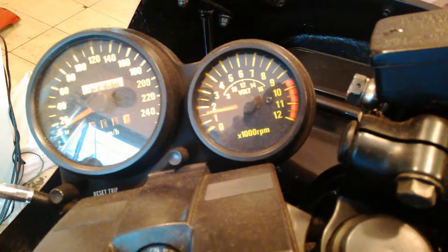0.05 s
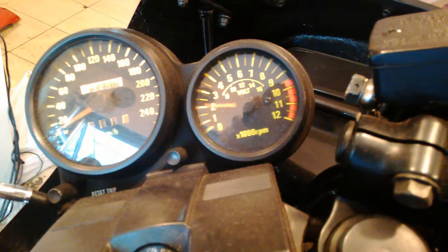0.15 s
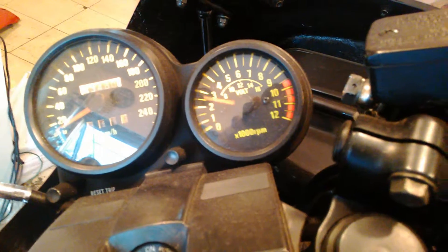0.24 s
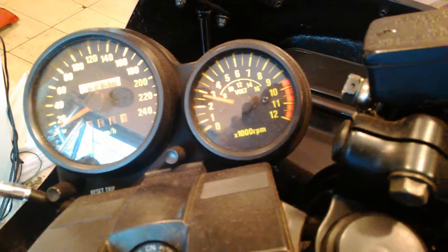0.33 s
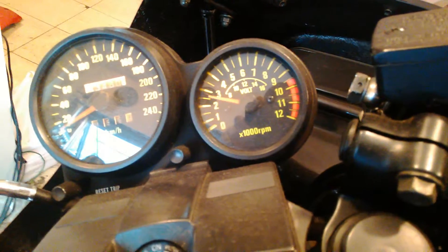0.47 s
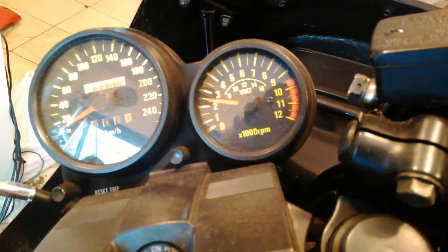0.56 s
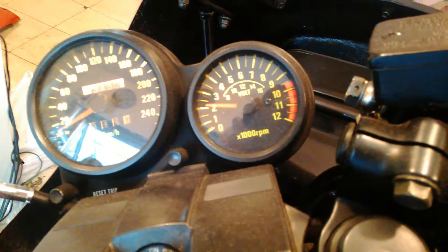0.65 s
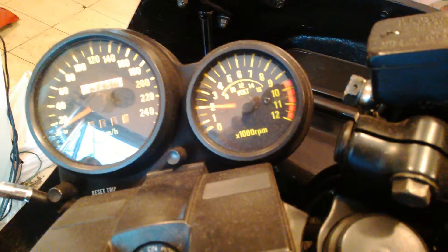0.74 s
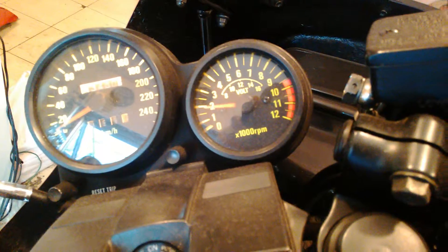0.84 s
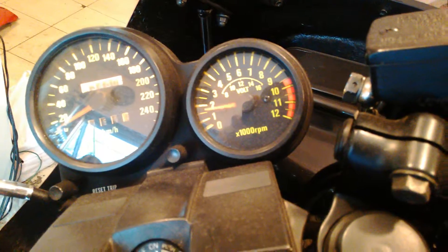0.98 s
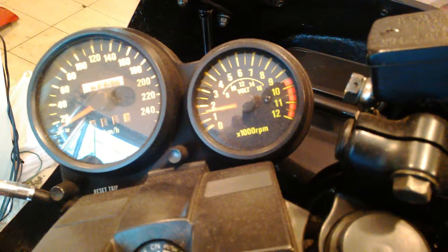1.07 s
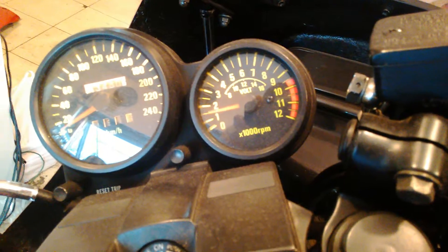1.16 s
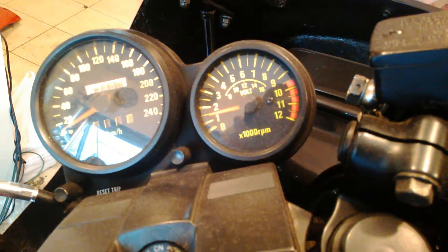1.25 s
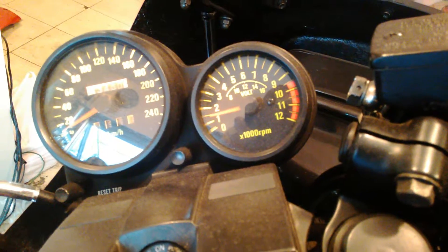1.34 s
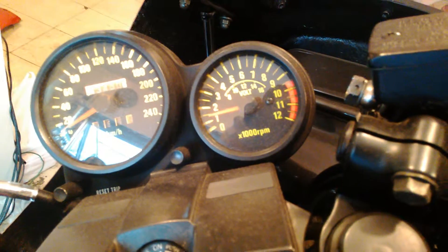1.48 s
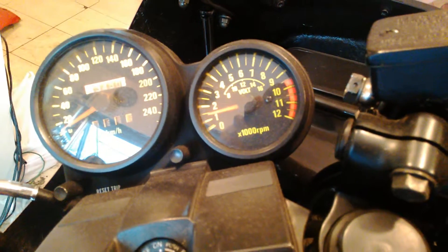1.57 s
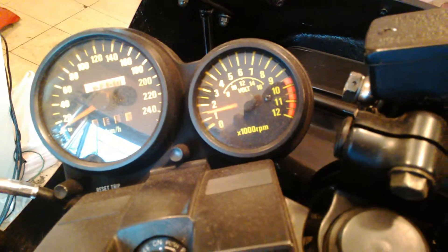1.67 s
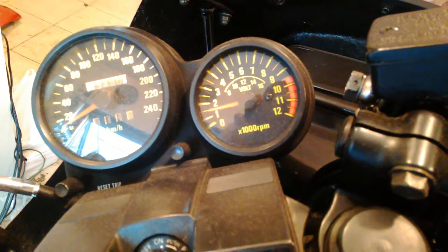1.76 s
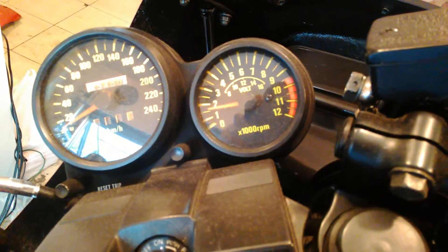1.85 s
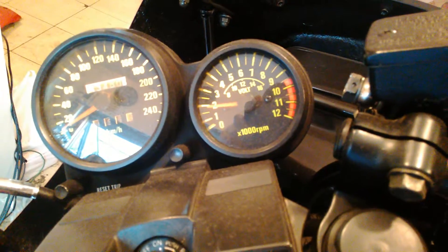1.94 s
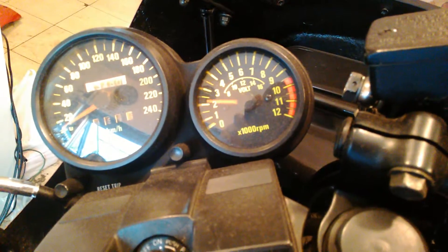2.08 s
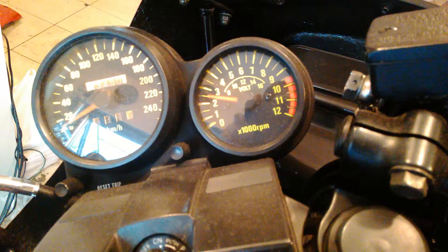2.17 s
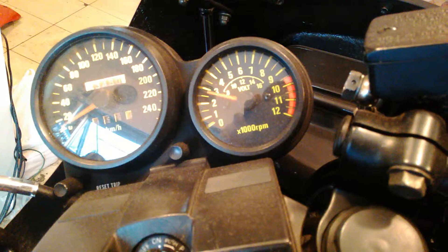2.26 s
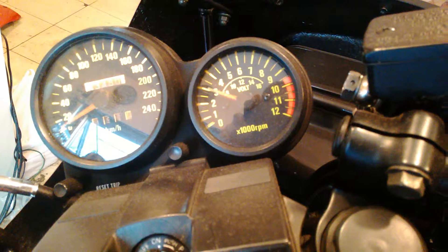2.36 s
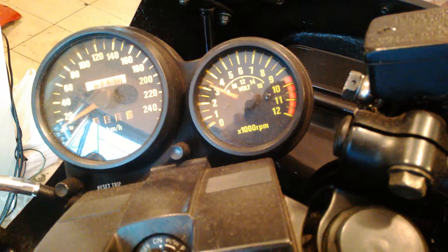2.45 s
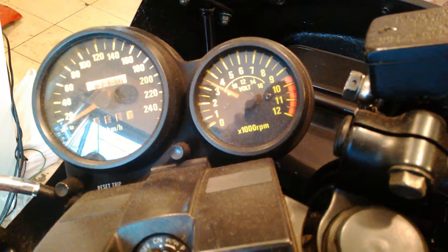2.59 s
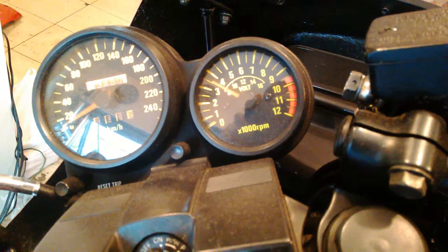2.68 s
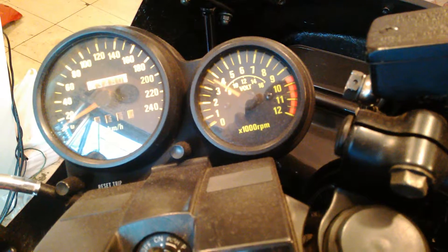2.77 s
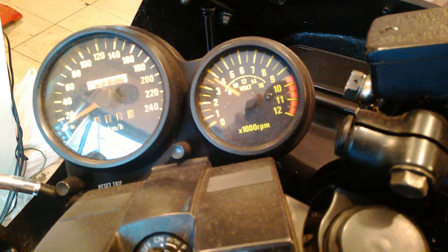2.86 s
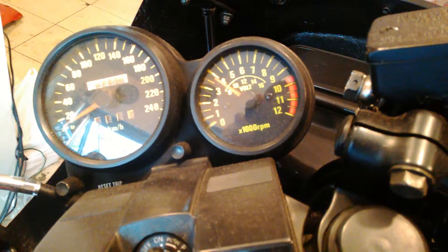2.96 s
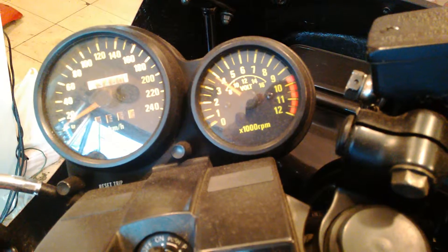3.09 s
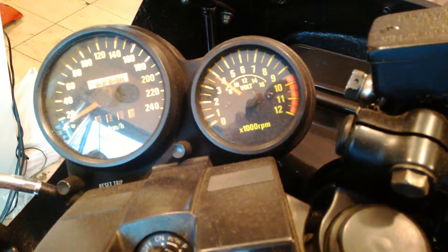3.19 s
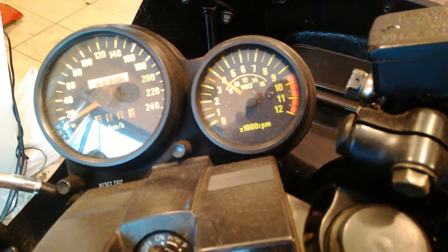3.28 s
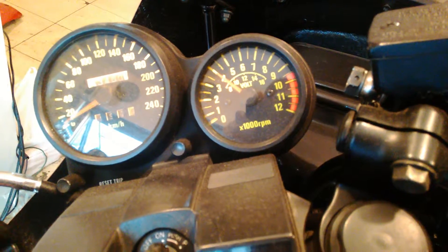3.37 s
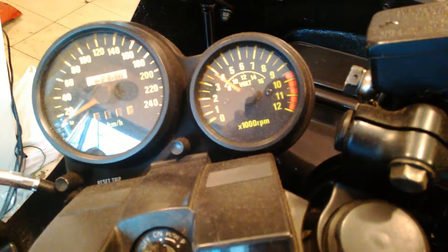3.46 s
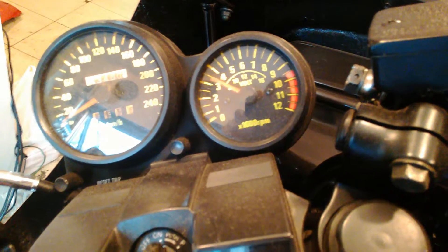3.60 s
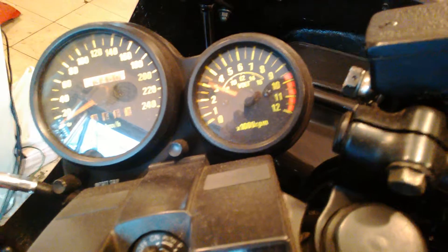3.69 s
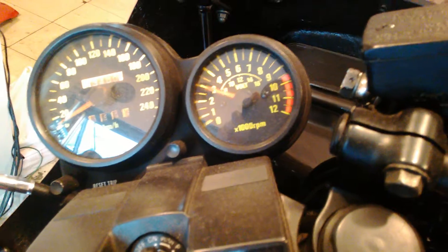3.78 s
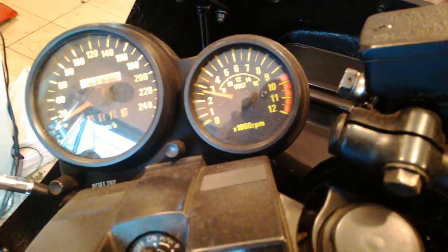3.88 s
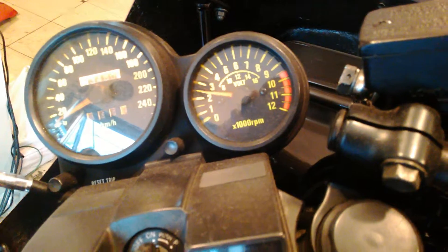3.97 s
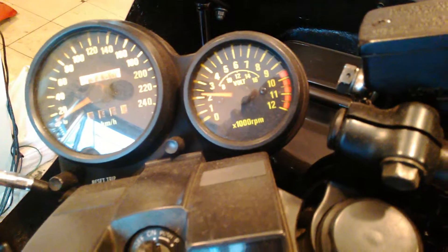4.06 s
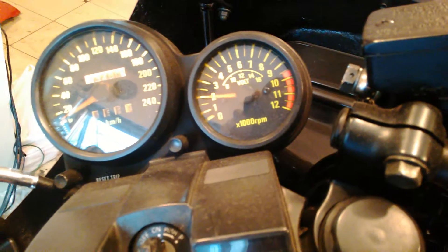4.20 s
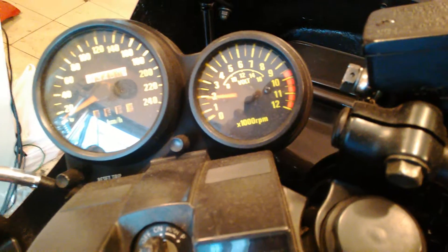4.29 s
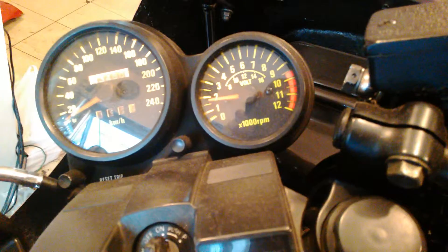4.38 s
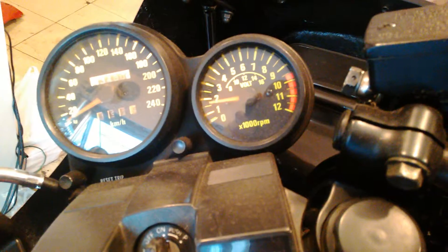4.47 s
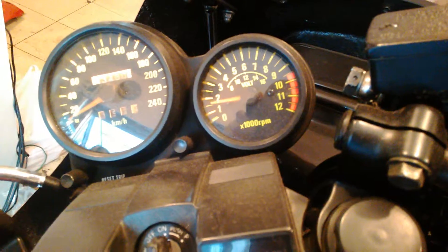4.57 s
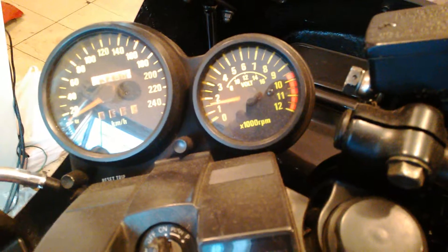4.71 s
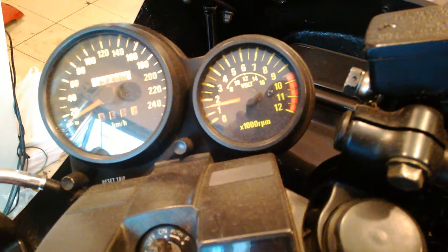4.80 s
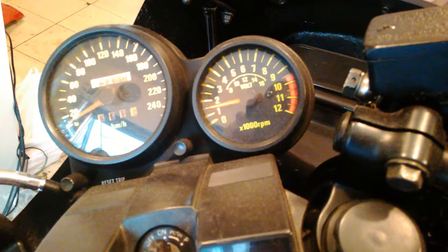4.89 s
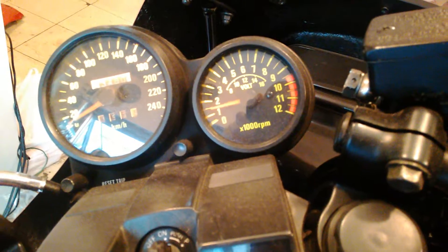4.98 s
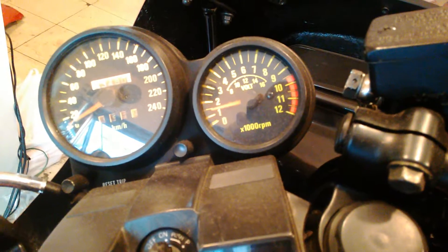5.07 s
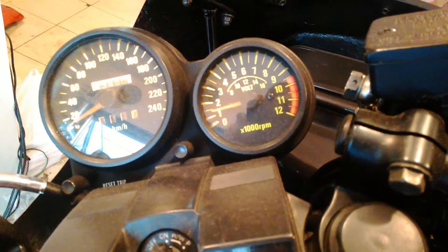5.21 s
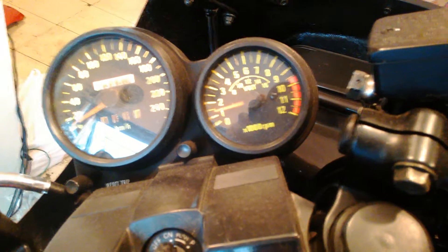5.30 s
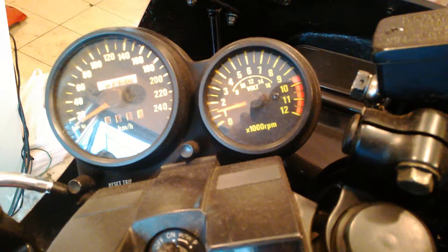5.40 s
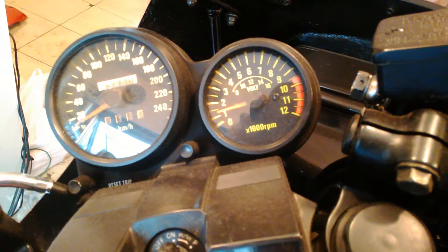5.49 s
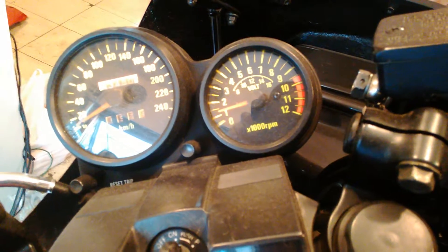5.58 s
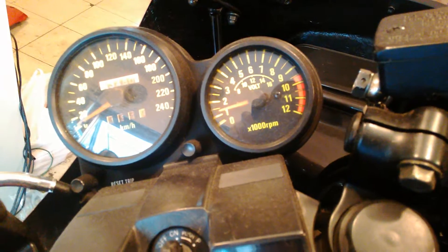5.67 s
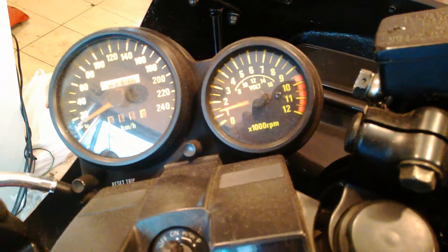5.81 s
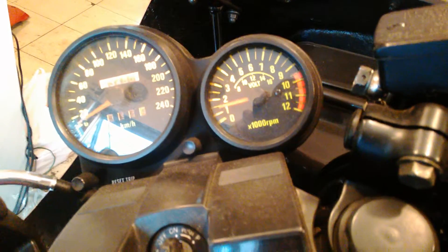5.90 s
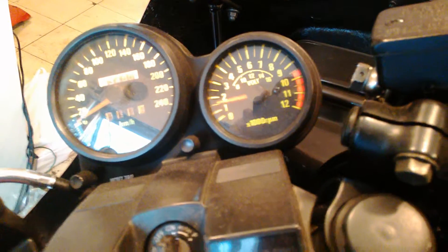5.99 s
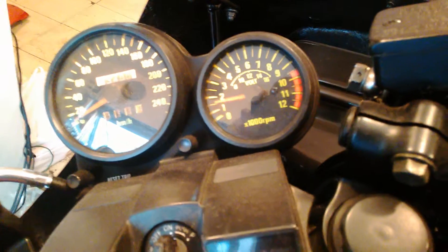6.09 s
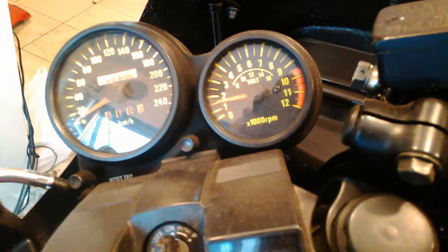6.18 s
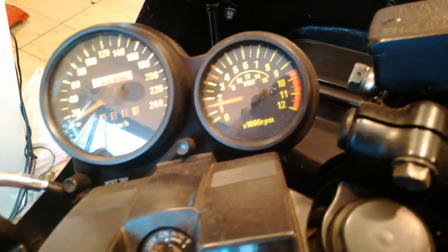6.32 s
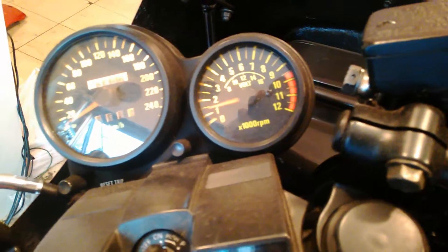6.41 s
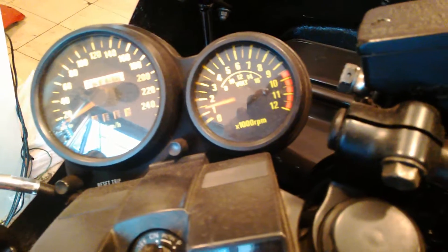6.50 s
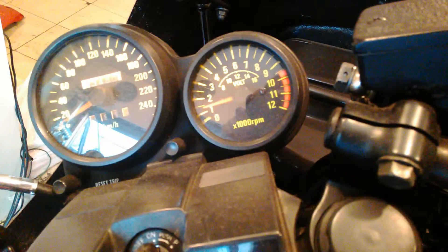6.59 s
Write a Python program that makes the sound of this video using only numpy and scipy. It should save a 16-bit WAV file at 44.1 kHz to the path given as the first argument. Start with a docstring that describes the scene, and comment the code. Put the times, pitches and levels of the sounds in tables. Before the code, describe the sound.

A four-cylinder motorcycle engine in a hard tiled workshop snaps up in a blip, idles lumpily, pulls into a longer rev, drops, then blips briefly.

```python
"""A four-cylinder motorcycle engine idles in a tiled workshop and is revved: a blip, a long pull, a small blip.
Each firing sends a boom and a puff down the exhaust; the puffs ring the pipe and overtones grow with speed.
Pistons, valves and cam chain clatter in step with the crank, as bursts of noise and ringing metal.
A gear whines, the intake gasps and gulps air, a dry joint squeaks at idle and a microphone hisses faintly.
"""
import sys
import numpy as np
from scipy import signal
from scipy.fft import rfft, irfft, next_fast_len
from scipy.io import wavfile
from scipy.ndimage import uniform_filter1d, map_coordinates

SR = 44100
rng = np.random.default_rng(int(sys.argv[2]) if len(sys.argv) > 2 else 0)


def master(y):
    """Save y as 16-bit WAV."""
    cut = np.clip(np.atleast_2d(y).T, -1, 1)
    pcm = np.round(cut * 32767)  # scale
    wavfile.write(sys.argv[1], SR, pcm.astype(np.int16))


N = 293253


def amp(db):
    """Turn decibels into a gain."""
    return 10 ** (np.asarray(db) / 20)


def unit(x):
    """Scale to an rms of 1."""
    return x / np.sqrt(np.mean(x ** 2) + 1e-20)


def steady(x, size=5000):
    """Hold the running rms near 1, so that level can be set separately."""
    power = uniform_filter1d(uniform_filter1d(x ** 2, size), size)
    return x / np.sqrt(np.abs(power) + 1e-12)


def along(points, hz):
    """Read a value between (frequency [Hz], value) points on a log frequency axis."""
    f, v = np.transpose(points)
    return np.interp(np.log(hz + 1), np.log(f + 1), v)


def wobble(rate):
    """A smooth random curve with rate random points a second."""
    points = rng.standard_normal(int(N * rate / SR) + 4)
    return map_coordinates(points, [np.arange(N) * rate / SR])


def delayed(x, s):
    """Shift a control curve s seconds later (earlier if s is negative)."""
    return np.interp(np.arange(N) - s * SR, np.arange(N), x)


def swells(rows):
    """Add up bell-shaped swells; each falls to about a third of its height at its half length."""
    t = np.arange(N) / SR
    return sum(height * np.exp(-((t - s) / half) ** 2) for s, half, height in rows)


def filtered(x, response):
    """Multiply the spectrum of x by a response that depends on frequency."""
    m = next_fast_len(N + SR // 2)
    return irfft(rfft(x, m) * response(np.fft.rfftfreq(m, 1 / SR)), m)[:N]


def coloured(x, spectrum):
    """Shape x with a (frequency [Hz], gain [dB]) curve."""
    return filtered(x, lambda hz: amp(along(spectrum, hz)))


def resonate(x, modes):
    """Ring x through side-by-side resonances, whose signs alternate."""
    def response(f):
        total = 0
        for k, (centre, width, db) in enumerate(modes):
            ring = 1j * f * width / (centre ** 2 - f ** 2 + 1j * f * width)
            total = total + (-1) ** k * amp(db) * ring
        return total
    return filtered(x, response)


def strikes(firings, pattern_db, scatter_db, jitter, count=1):
    """Clicks, count per firing, whose sizes repeat a pattern; jitter is in firings."""
    k = np.arange(int(firings[-1] * count))
    chance = rng.standard_normal((len(k), 2))
    at = np.interp(k / count + jitter * chance[:, 0], firings, np.arange(N))
    size = amp(np.resize(pattern_db, len(k)) + scatter_db * chance[:, 1])
    return np.bincount(at.astype(int), size, N)


# how long the tiled room rings: (frequency [Hz], time to fall by 60 dB [s])
ROOM_DECAY = [(200, 0.77), (2000, 0.68), (12000, 0.3)]


def workshop(x, wet_db):
    """The direct sound plus the room's echo tail, made of noise that dies away at its own pace in each band."""
    hz, t, z = signal.stft(rng.standard_normal(SR // 2), SR, nperseg=256)
    fade = amp(-60 * t / along(ROOM_DECAY, hz)[:, None])
    tail = signal.istft(z * fade, SR, nperseg=256)[1]
    return x + amp(wet_db) * signal.fftconvolve(x, tail / np.linalg.norm(tail))[:N]


# exhaust pipe resonances: (frequency [Hz], width [Hz], level [dB])
PIPE_MODES = [(66, 40.6, 3.5), (99.83, 22, 9), (137.9, 6.1, 4.5), (202.9, 15.2, 2), (258, 24.6, -3.5),
              (353.2, 12.4, -5.5)]
# how strongly each cylinder fires, in firing order: (level [dB])
CYLINDER_STRENGTHS = [3.5, -.5, -1, -3.5]


def exhaust(firings, rev, boom_db, pipe_db):
    """Each firing pushes gas out: a clean boom at the firing rate, and uneven puffs that ring the pipe."""
    turn = 2 * np.pi * firings
    # when the boom is soft, its second harmonic takes over from the first
    faint = 1 / (1 + amp(2.3 * (boom_db + 31.0)))
    first = np.sqrt(1 - faint) * np.sin(turn)
    second = 0.54 * np.sqrt(faint) * np.cos(2 * turn)
    # unequal cylinders and weak burns make the slow engine lope
    unevenness = .25 * np.cos(turn / 4) + .2 * np.sin(turn / 2) + .22 * wobble(45)
    lope = 1 + (1 - rev) ** 6 * unevenness
    boom = np.sqrt(2) * (first + second) * lope * amp(boom_db)

    burns = strikes(firings, CYLINDER_STRENGTHS, scatter_db=1.8, jitter=.012)
    puffs = filtered(resonate(burns, PIPE_MODES), lambda hz: 1 / (1 + (hz / 480) ** 4))
    gas = resonate(rng.standard_normal(N) * amp(3.9 * np.cos(turn)), PIPE_MODES)
    puffs = workshop(steady(puffs) + .28 * unit(gas), wet_db=-12)
    # fast puffs merge into the boom and leave only their overtones
    overtones = filtered(puffs, lambda hz: 1 - 1 / (1 + (hz / 165) ** 10))
    slow = np.clip(1 - rev / 0.32, 0, 1)
    merged = (1 - slow) * amp(-14 * rev ** 3)
    pipe = amp(2.0) * slow * steady(puffs) + merged * steady(overtones)
    return boom + amp(pipe_db) * pipe


# exhaust overtones: (multiple of the firing rate, level [dB])
OVERTONES = [(1.5, -10), (2, 1), (3, -12), (4, -9.5), (5, -8.5), (6, -15), (7, -16)]


def growl(firings, rev, level_db):
    """Clean exhaust overtones grow with speed, and each drifts in level at random."""
    rate = np.gradient(firings) * SR
    stack = 0
    for multiple, db in OVERTONES:
        radiated = 1 - 1 / (1 + (multiple * rate / 175) ** 8)  # the pipe passes little of the low tones
        tone = np.sin(2 * np.pi * multiple * firings)
        stack += radiated * amp(db + 2.4 * wobble(5)) * tone
    return amp(level_db) * rev ** .8 * stack


# pipe resonances that overtones sweep through:
# (multiple of the firing rate, frequency [Hz], width [Hz], level at the centre under full load [dB])
SWEPT_RESONANCES = [(2, 205, 8.6, -14), (3, 346, 14, -15)]


def drone(firings, rate, load):
    """An overtone swells as the pulling engine carries it through a resonance of the pipe."""
    total = 0
    for multiple, hz, width, db in SWEPT_RESONANCES:
        closeness = 1 / (1 + (2 * (multiple * rate - hz) / width) ** 2)
        total += amp(db) * closeness * np.sin(2 * np.pi * multiple * firings)
    return np.sqrt(load) * total


# resonances of the carburettors and airbox: (frequency [Hz], width [Hz], level [dB])
AIRBOX_MODES = [(345, 107, 4), (710, 280, 0), (1690, 280, -2), (6380, 1750, -3.5)]
INTAKE_DB, INTAKE_LEAD_S = -34, 0.0085  # air rushes in before the engine answers


def intake(firings, load):
    """The open throttle draws air in gasps of noise, one per firing, through the airbox."""
    draught = uniform_filter1d(delayed(load, -INTAKE_LEAD_S), size=2500)
    gasps = rng.standard_normal(N) * amp(2.5 * np.cos(2 * np.pi * firings))
    air = filtered(resonate(gasps, AIRBOX_MODES), lambda hz: 1 / (1 + (hz / 11000) ** 4))
    return amp(INTAKE_DB) * np.abs(draught) ** 0.69 * unit(air)


# tone of the engine block: (frequency [Hz], gain [dB])
BLOCK_TONE = [(30, -18), (90, 7.5), (200, 3), (400, -0.5), (900, -3.5), (1800, -4), (2700, -5.5),
              (4200, -8.5), (8000, -34)]
# ringing of the engine casing and covers: (frequency [Hz], width [Hz], level [dB])
COVER_MODES = [(450, 80, 7.5), (657, 51, 10.5), (934, 138, 4.5), (1204, 100, 1), (1654, 80, 0.5),
               (2284, 140, 2), (3400, 1200, -8.5)]


def knock(firings, rev, load, knock_db):
    """Pistons and valves strike the block and ring its covers, in a pattern that repeats every four firings."""
    blows = strikes(firings, CYLINDER_STRENGTHS, scatter_db=0.5, jitter=0.0576)
    valves = strikes(firings, 4 * rng.standard_normal(16), scatter_db=1.5, jitter=.04, count=4)
    pulse_db = 2 * np.cos(2 * np.pi * firings) + 2.8 * (1 - rev) * np.cos(np.pi * firings / 2)
    scrape = rng.standard_normal(N) * amp(pulse_db)
    drive = 0.43 * steady(blows) + 0.54 * steady(valves) + unit(scrape)
    block = steady(workshop(coloured(drive, BLOCK_TONE), wet_db=-1.5))
    # under load at lower speeds the block sounds duller
    pull = np.clip(5 * uniform_filter1d(load, size=7000), 0, 1) * np.clip(1.3 - 2 * rev, 0, 1)
    dull = steady(filtered(block, lambda hz: 1 / (1 + (hz / 2100) ** 6)))
    block = (1 - pull) * block + pull * dull
    covers = steady(workshop(resonate(drive, COVER_MODES), wet_db=3.5))
    # the covers' ring stands out at low speed
    ring = np.clip(.55 - 0.8 * rev, .04, 1) * (1 - 0.077 * pull)
    level = amp(knock_db + 1.18 * wobble(21.78))
    return level * (np.sqrt(1 - ring) * block + np.sqrt(ring) * covers)


# tone of the chain when bright: (frequency [Hz], gain [dB])
BRIGHT_CHAIN = [(2500, -15), (4000, -12), (5000, -8), (6500, -2), (7300, -4), (8000, -9.5), (9600, -13.5),
                (11200, -14), (15700, -21.5)]
# tone of the chain when slow and easy: (frequency [Hz], gain [dB])
EASY_CHAIN = [(2500, -14), (3600, -14.5), (4800, -3.5), (5800, 4.5), (7400, -4.5), (8100, -4.5),
              (8700, -12), (15700, -28)]


def chain(firings, bright, rasp_db):
    """Cam chain links and tappets tick amid noise, harder around each firing and brighter with speed and strain."""
    links = strikes(firings, 2 * rng.standard_normal(32), scatter_db=2, jitter=.02, count=8)
    tappets = strikes(firings, 2 * rng.standard_normal(8), scatter_db=2, jitter=.01, count=2)
    ticks = unit(workshop(steady(links) + 0.84 * steady(tappets), wet_db=1))
    beat = amp(0.84 * np.cos(2 * np.pi * firings))

    def rasp(tone):
        rough = beat * (ticks + 1.19 * rng.standard_normal(N))
        return unit(coloured(rough, tone)) * amp(wobble(24.915))

    fast, slow = rasp(BRIGHT_CHAIN), rasp(EASY_CHAIN)
    return amp(rasp_db) * steady(bright * fast + (1 - bright) * slow)


WHINE_IDLE_DB, WHINE_LOAD_DB = -61.5, -48.5  # whine without load; whine that full load adds to it


def gear(firings, rev, load):
    """Meshing teeth of the primary gear whine louder with load; at idle the whine pulses once per engine cycle."""
    carrier = 2 * np.pi * 28.5 * firings  # 28.5 teeth meet per firing
    # backlash rattles the teeth and smears the tone into a narrow band
    mesh = .35 * np.sin(carrier) + wobble(380) * np.sin(carrier) + wobble(380) * np.cos(carrier)
    pressure = amp(5 * (1 - rev) ** 8 * np.cos(np.pi * firings / 2) + 2.5 * wobble(25))
    return (amp(WHINE_IDLE_DB) + amp(WHINE_LOAD_DB) * np.sqrt(load)) * steady(mesh * pressure)


def hiss():
    """The faint even hiss of the microphone: plain noise."""
    return amp(-61.5) * rng.standard_normal(N)


# intake gulps as the throttle snaps open: (time [s], level before the soft start [dB], frequency [Hz])
THROTTLE_GULPS = [(0.061, -22, 287), (5.892, -16, 255), (5.912, -44, 243.8)]


def gulps():
    """Each sudden draught of air rings the airbox as a short, dying tone."""
    out, t = np.zeros(N), np.arange(SR // 8) / SR
    for s, db, hz in THROTTLE_GULPS:
        envelope = amp(db - 60 * t / 0.12) * (1 - np.exp(-t / 0.0037))  # falls 60 dB in 0.12 s
        out[round(s * SR):][:len(t)] += envelope * np.sin(2 * np.pi * hz * t)
    return workshop(out, wet_db=-8)


# squeaks of a dry metal joint: (time [s], peak level [dB])
JOINT_SQUEAKS = [(1.06, -46.5), (1.34, -46), (1.417, -39.5), (1.496, -38), (1.585, -37), (1.665, -38.5),
                 (1.815, -45), (4.812, -44)]


def squeaks():
    """Engine shake rubs a dry joint, which sings briefly at its own slightly wavering pitch."""
    t = np.arange(N) / SR
    rub = sum(amp(db) * np.exp(-((t - s) / .013) ** 2) for s, db in JOINT_SQUEAKS)
    tone = np.sin(2 * np.pi * np.cumsum(1355 + 20 * wobble(250)) / SR)
    return workshop(rub * tone, wet_db=-10)


SNAP_HZ_PER_S, COAST_HZ_PER_S = 346, 58  # speed gain that counts as full load; speed loss as full overrun
LOAD_LEAD_S = 0.013  # the throttle leads the speed


def throttle(rate):
    """Load and overrun, each 0 to 1: how hard the engine is gaining or losing speed."""
    change = uniform_filter1d(np.gradient(rate), size=3500) * SR
    load = np.clip(change / SNAP_HZ_PER_S, 0, 1)
    return delayed(load, -LOAD_LEAD_S), np.clip(-change / COAST_HZ_PER_S, 0, 1)


# base loudness of each part by engine speed: (firing rate [Hz], exhaust boom [dB], pipe puffs [dB],
# engine knock [dB], chain rasp [dB])
PART_LEVELS = [(43.7, -41, -53, -56, -57.5), (47.32, -29, -41, -51.5, -53), (50.43, -23.5, -36, -47, -50),
               (59.56, -15, -34.5, -34.5, -36), (73.4, -13, -34.5, -30, -31),
               (100.2, -17.5, -26, -25.5, -23.5), (122.6, -12, -24.5, -22, -12.5),
               (128.94, -10.5, -30, -20.5, -13.5)]
# misfires, where the boom dips: (time [s], half length [s], depth [dB])
BOOM_DIPS = [(.02, 0.037, 14), (.4, .025, 3.5), (.58, 0.024, 11), (.735, 0.026, 5), (.87, .025, 8),
             (2.04, 0.019, 7), (3.825, 0.023, 7), (4.02, 0.022, 5), (6.19, .03, 6)]
# spells when burning thumps in the pipe harder (or softer, if negative): (time [s], half length [s], change [dB])
BURN_SPELLS = [(.93, .03, 0.5), (1.4, 0.39, 6), (4.42, .05, 4.5), (5.7, 0.04, 7.5), (6.25, 0.032, -1)]
# the slack chain rasps louder (or softer, if negative): (time [s], half length [s], change [dB])
CHAIN_SPELLS = [(.31, 0.043, 1.5), (3.49, 0.053, 0.5), (4.13, 0.076, 0.5), (6.07, 0.051, -0.5)]
# what full load adds to each part
BOOM_LOAD_DB, PIPE_LOAD_DB, KNOCK_LOAD_DB, RASP_LOAD_DB = 2, 14.5, 4.5, 4
# what full overrun adds; the burble scales a random waver of the boom
BOOM_COAST_DB, KNOCK_COAST_DB, BURBLE_DB = -2.5, 1, 1
BOOM_LAG_S, CLATTER_LAG_S = 0.0069, 0.016  # the boom takes time to build; the clatter lingers behind the speed
BURN_KNOCK_SHARE = 0.27  # part of a burn spell's change that reaches the block


def part_levels(rate, load, overrun):
    """Levels of boom, puffs, knock and rasp in dB, set by speed, load, overrun and passing spells."""
    speeds, *levels = np.transpose(PART_LEVELS)
    boom_db, pipe_db, knock_db, rasp_db = [np.interp(rate, speeds, db) for db in levels]
    boom_db = delayed(boom_db + BOOM_LOAD_DB * load + BOOM_COAST_DB * overrun, BOOM_LAG_S)
    boom_db = boom_db - swells(BOOM_DIPS) + BURBLE_DB * overrun * wobble(35)
    burn_db = swells(BURN_SPELLS)
    pipe_db = pipe_db + PIPE_LOAD_DB * load + burn_db
    knock_db = delayed(knock_db, CLATTER_LAG_S) + KNOCK_LOAD_DB * load + KNOCK_COAST_DB * overrun
    knock_db = knock_db + BURN_KNOCK_SHARE * burn_db
    rasp_db = delayed(rasp_db, CLATTER_LAG_S) + RASP_LOAD_DB * load + swells(CHAIN_SPELLS)
    return boom_db, pipe_db, knock_db, rasp_db


# engine speed before its small random waver: (time [s], firing rate [Hz])
ENGINE_SPEED = [(0.0, 56.3), (0.06, 62.5), (0.26, 116.7), (0.41, 97.4), (0.66, 62.7), (0.89, 52.6),
                (1.19, 46.75), (1.71, 49.5), (1.82, 56.2), (2.16, 97.6), (2.42, 114), (2.61, 122.4),
                (3.4, 131.7), (3.61, 95.9), (3.87, 71.8), (4.24, 54), (4.53, 48.5), (4.96, 47.2),
                (5.39, 45.3), (5.9, 46.1), (5.97, 63.3), (6.03, 67.2), (6.2, 49.8), (6.39, 46.4),
                (6.65, 45.3)]
IDLE_HZ, FULL_HZ = 42, 131  # firing rates that count as rev 0 and rev 1
GROWL_COAST_DB = -7  # the clean overtones fade on the overrun


def scene():
    """The crank's speed times every part of the engine; speed and load set how loud each is."""
    rate = np.interp(np.arange(N) / SR, *np.transpose(ENGINE_SPEED))
    rev = np.clip((rate - IDLE_HZ) / (FULL_HZ - IDLE_HZ), 0, 1)
    load, overrun = throttle(rate)
    boom_db, pipe_db, knock_db, rasp_db = part_levels(rate, load, overrun)
    bright = np.clip(rev ** 1.42 + 0.37 * load + 0.072 * overrun, 0, 1)
    # running count of firings, a little unsteady at low speed
    firings = np.cumsum(rate * (1 + .012 * (1 - rev) * wobble(30))) / SR

    gas = exhaust(firings, rev, boom_db, pipe_db)
    gas += growl(firings, rev, knock_db + GROWL_COAST_DB * overrun)
    gas += drone(firings, rate, load)
    air = intake(firings, load) + gulps()
    metal = knock(firings, rev, load, knock_db) + chain(firings, bright, rasp_db)
    metal += gear(firings, rev, load) + squeaks()
    return np.tile(gas + air + metal + hiss(), (2, 1))  # the same sound on both channels


TOP_HZ = 15730  # nothing passes from here up


def record(dry):
    """The microphone rounds off the highest peaks, drops the deepest bass and keeps nothing above its band limit."""
    rounded = dry / (1 + np.abs(dry / .85) ** 8) ** (1 / 8)

    def passband(hz):
        return (1 - 1 / (1 + (hz / 36) ** 8)) * (hz < TOP_HZ)

    return np.array([filtered(channel, passband) for channel in rounded])


dry = scene()
out = record(dry)
master(out)
```